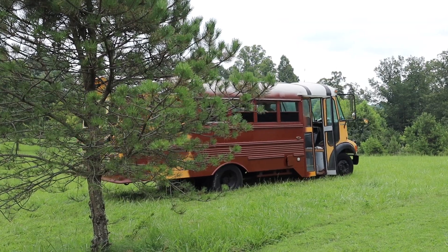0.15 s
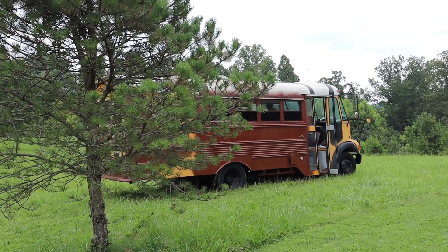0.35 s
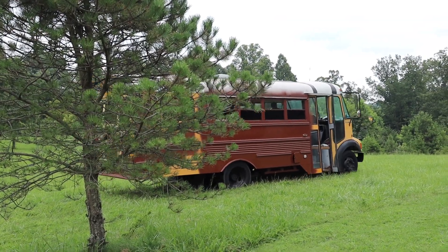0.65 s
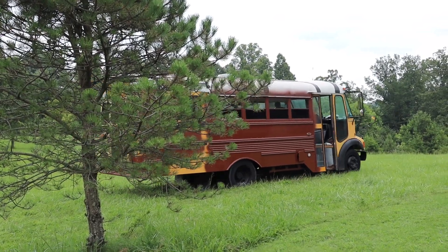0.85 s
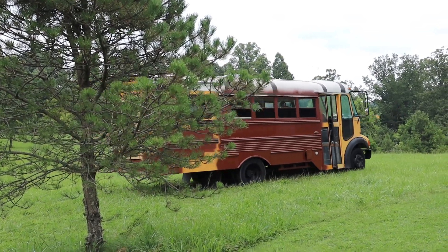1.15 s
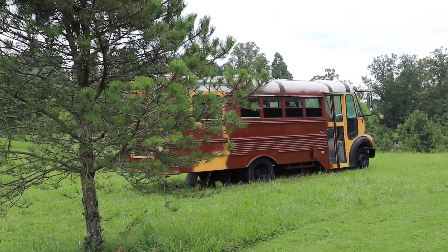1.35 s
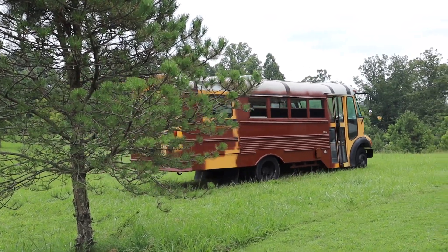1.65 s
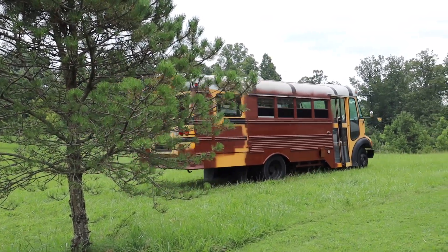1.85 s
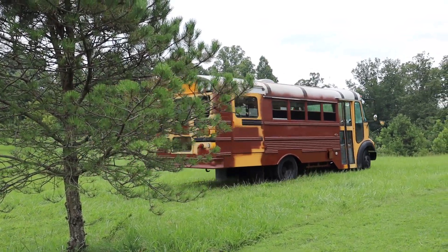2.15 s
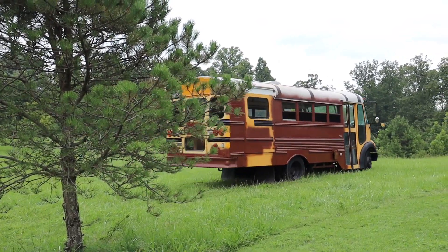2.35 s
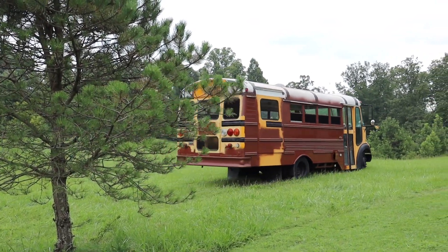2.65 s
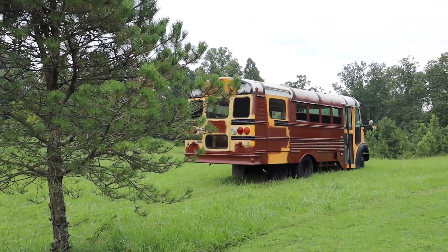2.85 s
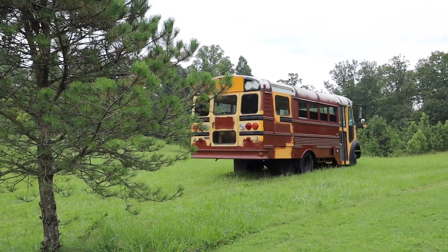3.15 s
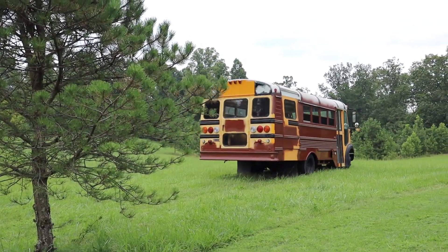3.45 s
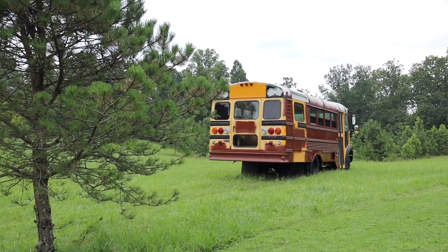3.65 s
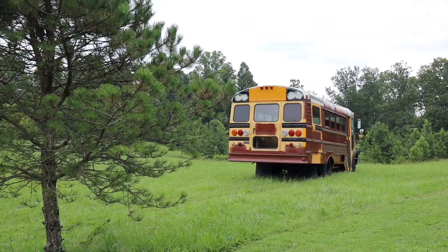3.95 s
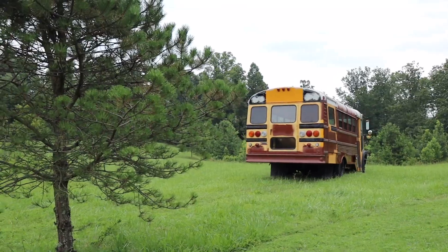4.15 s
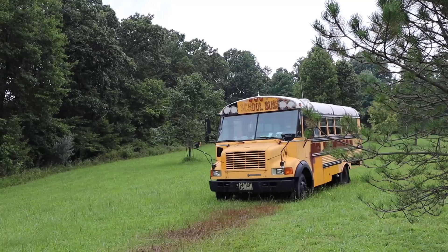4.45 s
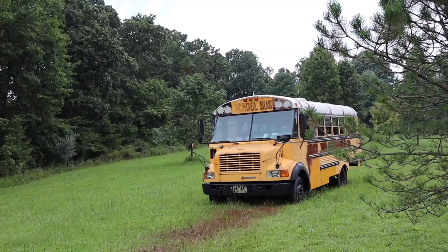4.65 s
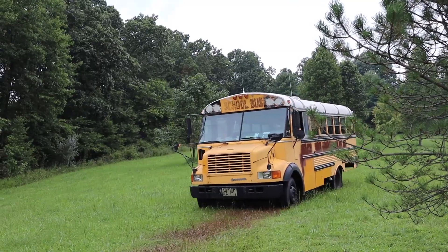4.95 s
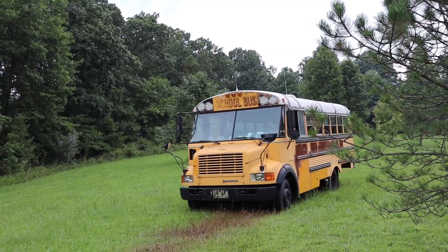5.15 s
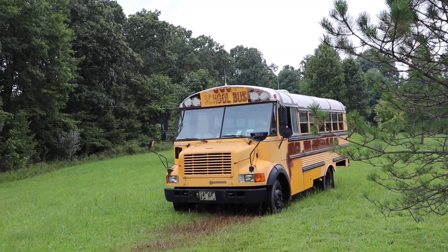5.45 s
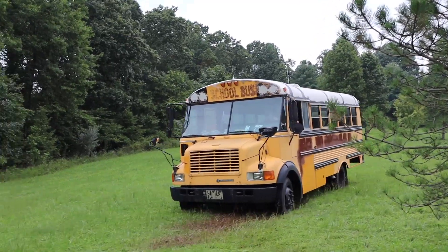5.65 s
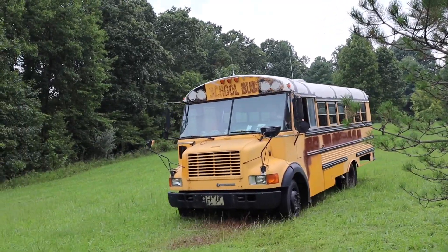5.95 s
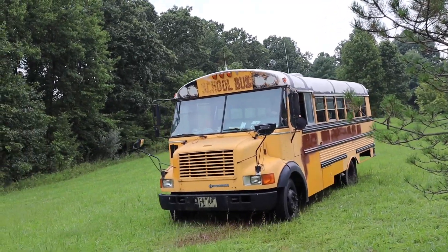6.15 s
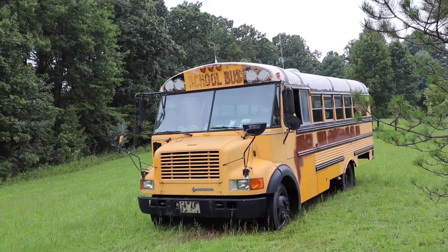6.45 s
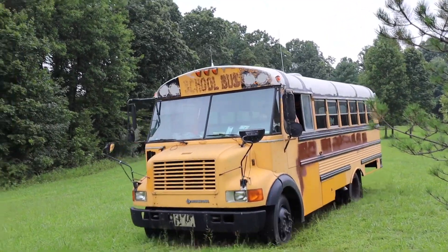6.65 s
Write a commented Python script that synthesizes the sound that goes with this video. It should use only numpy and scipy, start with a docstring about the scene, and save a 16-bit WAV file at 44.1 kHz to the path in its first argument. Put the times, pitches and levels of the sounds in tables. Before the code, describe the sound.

An old diesel bus pulls away with a clattering drone, drops to a lumpy idle, then abruptly comes closer from the front, revving up over crackling grass.

```python
"""An old V8 diesel bus crawls over a grass field: from behind it pulls away, drops to idle and picks up;
then the view jumps to its front as it comes closer and gathers speed. One crank phase drives the exhaust
(summed sines), body rumble and clatter (noise rings struck at each firing); a pulley hums out of step with it.
The body clunks in clusters of modes, grass crackles and snaps under the tyres (noise bursts),
and insects and a soft low noise (both filtered noise) lie around it."""
import sys
import numpy as np
from scipy import signal
from scipy.fft import rfft, irfft
from scipy.io import wavfile
from scipy.ndimage import uniform_filter1d

SR = 44100
rng = np.random.default_rng(int(sys.argv[2]) if len(sys.argv) > 2 else 0)


def persist_wave(psi):
    """Save psi, clipped to +-1, as 16-bit WAV."""
    counts = np.round(np.clip(psi, -1, 1) * 32767).astype(np.int16)
    wavfile.write(sys.argv[1], SR, np.atleast_2d(counts).T)


N = 299880
TIME, HZ = np.arange(N) / SR, np.fft.rfftfreq(N, 1 / SR)

CUT_S = 4.442  # the view jumps from behind the bus to its front
CYLINDERS = 8
CRAWL_HZ = 85  # firings per second at crawling speed, the reference for all levels that follow speed
PULL_CLATTER_DB, PULL_SHAKE_DB = 1.5, 18  # lift per octave a second of rising speed
BURST_BUZZ = 0.45  # the clatter swells by 1 minus this share of each idling burst's dB, the cover buzz by twice it

# engine speed from behind: pulls away, drops to idle, picks up: t/s, firing rate/Hz
SPEED_BEHIND = [(0, 82.2), (.5, 84.4), (1.1, 85.5), (2, 87.5), (2.2, 87.3), (2.31, 81), (2.42, 58.5),
                (2.6, 54.6), (2.87, 49.6), (3.09, 51.3), (3.3, 50.4), (3.63, 50.3), (3.98, 54),
                (4.44, 57.3)]
# engine speed from the front, gathering: t/s, firing rate/Hz
SPEED_FRONT = [(4.44, 84.2), (4.95, 84.5), (5.3, 87.6), (5.5, 90.4), (5.9, 93.4), (6.3, 95.3), (6.53, 95.8),
               (6.8, 98)]
# likeness of left and right from behind: f/Hz, correlation (-1..1)
SAME_BEHIND = [(130, 0.95), (700, 0.95), (1250, 0.85), (2000, 0.8), (3000, 0.55), (4200, 0.75),
               (6000, -0.25), (8000, 0), (14000, 0.6)]
# stereo balance from the front: f/Hz, left minus right/dB
PAN_FRONT = [(680, 4), (1250, -1), (2300, -3.5), (4200, -4), (7700, 5), (14000, -1.5)]


def amp(db):
    """Decibels to gain."""
    return 10 ** (np.asarray(db) / 20)


def unit(x):
    """Scales to rms 1."""
    return x / np.sqrt(np.mean(x ** 2) + 1e-20)


def curve(rows):
    """Each column of a table of (t/s, ..) rows at every sample."""
    s, *columns = np.transpose(rows)
    return [np.interp(TIME, s, c) for c in columns]


def read(points):
    """A table of (f/Hz, value) rows at every frequency, interpolated along log frequency."""
    f, value = np.transpose(points)
    return np.interp(np.log(HZ + 1), np.log(f + 1), value)


def colour(x, db):
    """Filters by a gain in dB at every frequency."""
    return irfft(rfft(x) * amp(db), N)


def band_rms(x, lo, hi):
    """Rms of the part of x between two frequencies."""
    return np.sqrt(2 * np.sum(abs(rfft(x)[(HZ > lo) & (HZ < hi)]) ** 2)) / N


def drift(hz):
    """Slow random wander of rms 1, up to about hz."""
    knots = rng.standard_normal(1000)
    return unit(np.interp(TIME * 2 * hz, np.arange(1000), knots))


def add(mix, s, sound):
    """Mixes a sound in at time s."""
    part = mix[..., round(s * SR):][..., :sound.shape[-1]]
    part += sound[..., :part.shape[-1]]


def bell(hz, centre, width):
    """Shape of a resonance: 1 at its centre, a half at its edges."""
    return 1 / (1 + (2 * (hz - centre) / width) ** 2)


def swell(s, half_s):
    """A smooth rise and fall, 1 at time s and 1/e at half_s to either side."""
    return np.exp(-np.minimum(((TIME - s) / half_s) ** 2, 20))


def by_view(front, behind_value, front_value):
    """One value while the bus is heard from behind, another from the front."""
    return (1 - front) * behind_value + front * front_value


def stereo(pair, same, pan):
    """Turns two unrelated sounds into a left and right that are partly alike."""
    a, b = rfft(pair)
    likeness = np.clip(read(same), -.95, 1)
    mid, side = a * np.sqrt((1 + likeness) / 2), b * np.sqrt((1 - likeness) / 2)
    left = (mid + side) * amp(read(pan) / 2)
    right = (mid - side) * amp(-read(pan) / 2)
    # keeps the shared middle steady whatever the likeness
    return irfft(np.array([left, right]) / np.sqrt((1 + likeness) / 2), N)


def idling(revs):
    """0 at crawling speed and above, 1 at idle, 0.7 octaves lower."""
    return np.clip(-revs / 0.7, 0, 1)


def speeding_up(smooth_s=0.3):
    """How fast the approaching engine gathers speed, in octaves a second."""
    rise = np.gradient(np.log2(curve(SPEED_FRONT)[0])) * SR
    return uniform_filter1d(rise, round(smooth_s * SR))


def running_down(smooth_s=0.054):
    """How fast the engine heard from behind loses speed, in octaves a second."""
    fall = -np.gradient(np.log2(curve(SPEED_BEHIND)[0])) * SR
    return uniform_filter1d(np.maximum(fall, 0), round(smooth_s * SR))


def note_db(firing_hz, revs, front, pipe_hz=84.7, width_hz=9.1, db_per_octave=9.5):
    """The firing note grows with speed, booms in the exhaust pipe, and fades or nears with the bus."""
    # each view: level/dB as it opens, change/dB per s, lift/dB at the pipe resonance
    note_behind = (-22.5, -3.5, 11.7)
    note_front = (-30.5, 2.8, 13)
    start_db, db_per_s, lift_db = (by_view(front, *pair) for pair in zip(note_behind, note_front))
    moving_db = db_per_s * (TIME - front * CUT_S)
    return start_db + moving_db + lift_db * bell(firing_hz, pipe_hz, width_hz) + db_per_octave * revs


def exhaust(cycles, cycle_hz, revs, front, waver_db=1.16, flutter_db=0.35, stumble=0.0005):
    """The firing note, its overtones and tones of the unequal cylinders, swelling across resonances."""
    # tones before speed and boom lifts: multiple of the engine cycle, level/dB pulling away,
    # level/dB at idle, level/dB crawling in from the front, level/dB once up to speed
    tone_levels = [(4, -57, -60, -54, -49), (6, -49, -38, -42, -37), (7, -30, -43, -41, -28.5),
                   (10, -37, -37, -37.5, -36.5), (11, -38, -58, -37, -42), (12, -31, -38, -40, -43),
                   (13, -44, -48, -34, -32), (14, -32.5, -41, -45, -30.5), (15, -43, -48, -44, -37),
                   (16, -30.5, -35.5, -32, -35.5), (17, -45, -47, -41, -37), (18, -49, -42, -46, -37.5),
                   (19, -47, -61, -32.5, -29.5), (20, -50, -47, -44, -43), (21, -42, -53, -28.5, -34),
                   (22, -53, -48, -29, -46), (24, -41.5, -38.5, -35.5, -44), (26, -42, -59, -43, -61),
                   (27, -47, -63, -41, -45), (28, -42.5, -49, -48, -49), (29, -50, -56, -42.5, -51),
                   (30, -56, -44, -51, -44), (32, -52.5, -52, -43.5, -42.5), (34, -46.5, -53, -42, -61),
                   (38, -49.5, -43.5, -44.5, -54), (48, -55, -56, -50, -48), (53, -68.5, -53, -67, -60),
                   (56, -59.5, -63, -46, -50)]
    # resonances crossed by the tones: f/Hz, width/Hz, lift/dB at idle from behind, lift/dB from the front
    boom_modes = [(102, 13, 7, 5.5), (166.2, 14.7, 13, 1.5), (559, 17, 15, 17.5)]
    driving_hz, db_per_octave = 93, 4  # firing rate once up to speed; growth of the tones

    cycles = cycles + stumble * drift(20)  # no two firings are evenly spaced
    level_db = note_db(cycle_hz * CYLINDERS, revs, front) + flutter_db * drift(11)
    out = amp(level_db) * np.cos(2 * np.pi * cycles * CYLINDERS)
    idle = idling(revs)
    driving = np.clip(revs / np.log2(driving_hz / CRAWL_HZ), 0, 1)
    booms = [(hz, width, by_view(front, idle * idle_lift, front_lift))
             for hz, width, idle_lift, front_lift in boom_modes]
    for order, pulling_db, idle_db, crawling_db, driving_db in tone_levels:
        behind_db = pulling_db + idle * (idle_db - pulling_db)
        ahead_db = crawling_db + driving * (driving_db - crawling_db)
        boom_db = sum(db * bell(order * cycle_hz, hz, width) for hz, width, db in booms)
        level_db = by_view(front, behind_db, ahead_db) + db_per_octave * revs + boom_db
        tone = np.cos(2 * np.pi * (order * cycles + rng.random()))
        out += amp(level_db + waver_db * drift(5)) * tone
    return np.sqrt(2) * out  # levels are rms


def knocks(cycles, ring_s, uneven, fresh, jitter_s=.00005, chance_db=1.5, rise_s=0.0019, delay_s=0.001001):
    """Each cylinder strikes the block with its own ring once a cycle; a share of every blow is new noise."""
    # strength of each cylinder's knock in firing order, scaled by uneven: level/dB
    cylinder_db = [0.15, 0.63, 1.3, 0.54, 0.87, -2.1, 0.68, -0.81]
    at = np.flatnonzero(np.diff(np.floor(cycles * CYLINDERS)))
    cylinder = np.arange(1, len(at) + 1) % CYLINDERS
    late, force = rng.standard_normal((2, len(at)))
    at = np.clip(at + np.round((delay_s + late * jitter_s) * SR).astype(int), 0, N - 1)
    size = amp(uneven * np.array(cylinder_db)[cylinder] + chance_db * force)
    t = np.arange(4096) / SR
    decay = np.exp(-t / ring_s) * (1 - np.exp(-t / rise_s))
    rings, power = np.zeros((2, N)), np.zeros(N)
    for k in range(CYLINDERS):
        blows = np.bincount(at[cylinder == k], size[cylinder == k], N)
        ring = decay * rng.standard_normal((2, len(t)))
        rings += signal.oaconvolve(blows[None], ring, axes=1)[:, :N]
        power += blows ** 2
    envelope = np.sqrt(abs(signal.oaconvolve(power, decay ** 2)[:N]))
    hiss = envelope * rng.standard_normal((2, N))
    return np.sqrt(1 - fresh) * unit(rings) + np.sqrt(fresh) * unit(hiss)


def rumble(cycles, revs, front, behind_db=-31.5, front_db=-32.5, db_per_octave=6):
    """Puffs of gas shake the pipe and the body panels, harder while the bus gathers speed."""
    # relative colour of the shaking: f/Hz, gain/dB
    rumble_colour = [(20, -30), (40, -15), (70, -3), (130, -4.5), (210, -.5), (290, -2), (400, -9.5),
                     (480, -13), (600, -34), (1000, -82)]
    blows = knocks(cycles, ring_s=0.024, uneven=0.74, fresh=0.66, chance_db=1.2)[0]
    out = colour(blows, read(rumble_colour))
    level_db = by_view(front, behind_db, front_db) + db_per_octave * revs + PULL_SHAKE_DB * speeding_up()
    return amp(level_db) * out / band_rms(out, 190, 480)


def pulley(cycles, cycle_hz, revs, front, waver_db=2, db_per_octave=14, turns_per_cycle=6.43):
    """A belt-driven pulley hums out of step with the firings and sinks away at idle."""
    # hum at crawling speed: harmonic, level/dB from behind, level/dB from the front
    hum_levels = [(2, -37, -36), (3, -44, -49.5), (4, -39, -39), (5, -56, -43.5), (6, -48.5, -47.5),
                  (7, -58, -52.5), (10, -60, -45)]
    # panel that sings when the hum crosses it, from behind: f/Hz, width/Hz, lift/dB
    panel_hz, width_hz, lift_db = (484, 9.7, 18.4)
    hum = np.zeros(N)
    for k, behind_db, front_db in hum_levels:
        order = k * turns_per_cycle
        sing_db = (1 - front) * lift_db * bell(order * cycle_hz, panel_hz, width_hz)
        level_db = by_view(front, behind_db, front_db) + sing_db + waver_db * drift(5.4)
        hum += amp(level_db) * np.cos(2 * np.pi * (order * cycles + rng.random()))
    return np.sqrt(2) * amp(db_per_octave * revs) * hum


def with_fan(blows):
    """The even rush of the cooling fan fills the gaps between knocks, mostly in the treble."""
    # smooth rush in the engine noise: f/Hz, share of power (0-1)
    fan_share = [(500, 0.13), (2500, 0.24), (4500, 0.16), (7000, 0.4), (12000, 0.9)]
    share = read(fan_share)
    rush = rfft(rng.standard_normal((2, N)))
    return irfft(rfft(blows) * np.sqrt(1 - share) + rush * np.sqrt(share), N)


def clatter(blows, shape, from_front):
    """Combustion knock coloured by the resonances of the block, at rms 1 in its middle band."""
    # ringing of block and covers: f/Hz, width/Hz, lift/dB from behind, lift/dB from the front
    block_modes = [(563, 9.1, 10, -2.5), (811, 89, 3, 9), (1275, 113, 8, 7.5), (1722, 18, 0, 3),
                   (1860, 49, 8, 8.5), (1954, 61, 9, 4.5), (2200, 53, 3, -3.5), (2393, 28, 5, 4.5),
                   (2515, 47, 7, -1.5), (2833, 37, 6, 7.5), (3060, 39, 6.5, 3), (3860, 420, 3, 2)]
    peaks = sum((front_lift if from_front else behind_lift) * bell(HZ, hz, width)
                for hz, width, behind_lift, front_lift in block_modes)
    out = colour(blows, read(shape) + peaks)
    return out / band_rms(out.mean(0), 1100, 4000)


def clatter_behind(cycles):
    """The throttle blends two colours of the same knocks, one under load and one at idle."""
    # throttle opening, the share of the loaded colour: t/s, share (0-1)
    throttle = [(0, 0.65), (2.22, 0.56), (2.42, 0.43), (4.4, 0.19)]
    # relative colour under load: f/Hz, gain/dB
    load_colour = [(200, -11), (600, -13.5), (900, -7), (1500, -4), (2000, -0.5), (2500, -3.5), (3100, -5),
                   (3400, -7), (3900, -8.5), (5500, -15), (7500, -31), (10500, -19), (12200, -39),
                   (14500, -72)]
    # relative colour at idle: f/Hz, gain/dB
    idle_colour = [(200, -21), (600, -19.5), (900, -14.5), (1300, -10.5), (1500, -9.5), (1700, 5.5),
                   (2200, -1.5), (3000, -12), (3300, -22.5), (4000, -19.5), (5000, -31.5), (7000, -24),
                   (10500, -41.5), (12200, -44), (14500, -64)]
    # stereo balance from behind: f/Hz, left minus right/dB
    pan_behind = [(200, -10.5), (680, 1.5), (1250, -5.5), (2300, -5), (3000, -10), (4200, -5), (7700, 0)]
    blows = knocks(cycles, ring_s=0.02, uneven=0.76, fresh=0.064, jitter_s=.00003, chance_db=1.44)
    blows = stereo(with_fan(blows), SAME_BEHIND, pan_behind)
    load = curve(throttle)[0]
    return load * clatter(blows, load_colour, False) + (1 - load) * clatter(blows, idle_colour, False)


def bursts_db():
    """Short swells of the idling clatter as the engine rocks on its mounts, in dB."""
    # bursts, shared by clatter and cover: t/s, swell/dB
    burst_swells = [(2.43, 2), (2.49, 0.5), (2.555, 2.5), (2.64, 2.5), (2.705, 2.5), (2.8, 3.5),
                    (2.857, 3.5), (2.912, 2.5), (2.96, 1.5), (3.03, 1), (3.13, 0), (3.165, 3), (3.24, 1),
                    (3.33, 0.5), (3.462, 4.5), (3.61, 2), (3.655, 3), (3.75, 1.5), (3.805, 0.5), (3.84, 2),
                    (3.93, 0.5), (3.995, 0.5), (4.13, 1.5), (4.29, 1)]
    return sum(db * swell(at, 0.019) for at, db in burst_swells)


def surges_db(revs, idle_db=-1):
    """The clatter dips as the throttle shuts, then comes in bursts at idle, in dB."""
    # dip as the throttle shuts: t/s, change/dB, half length/s
    s, dip_db, half_s = (2.327, -2.5, 0.074)
    return dip_db * swell(s, half_s) + idle_db * idling(revs) + (1 - BURST_BUZZ) * bursts_db()


def insects(level_db=-55, swell_db=1):
    """A far, even chorus of band-shaped noise off to one side of the field."""
    # relative colour of the chorus: f/Hz, gain/dB
    chorus_colour = [(3000, -40), (6000, -9), (6900, 10), (7900, 10.5), (8700, -26), (10000, -17),
                     (11000, -20), (12600, -40), (14500, -55)]
    chorus = stereo(rng.standard_normal((2, N)), SAME_BEHIND, PAN_FRONT)
    chorus = colour(chorus, read(chorus_colour))
    return amp(level_db + swell_db * drift(8.4)) * chorus / np.std(chorus.mean(0))


def low_noise(level_db=-51, sway_db=3):
    """Soft low noise around the scene, partly alike on both sides."""
    # relative colour of the low noise: f/Hz, gain/dB
    low_colour = [(10, -5), (25, -1), (45, -15), (100, -42), (250, -1), (600, -9.5), (2000, -64)]
    noise = rng.standard_normal(N) + rng.standard_normal((2, N))
    return amp(level_db + sway_db * drift(1.1)) * unit(colour(noise, read(low_colour)))


def clunks(count=7, rise_s=0.004):
    """On bumps, a loose panel rings briefly with a cluster of close modes."""
    # bumps: t/s, peak level/dB, f/Hz, t60/s, spread of the modes as a share of the pitch
    bump_hits = [(1.365, -16.5, 823, 0.033, 0.157), (2.174, -19.5, 915, 0.03, .07),
                 (3.917, -34, 855, 0.044, .08), (3.917, -20.5, 353, 0.092, 0.077),
                 (3.953, -27, 308, 0.35, 0.11)]
    out, t = np.zeros(N), np.arange(SR // 3) / SR
    for s, db, hz, t60, spread in bump_hits:
        modes = sum(np.sin(2 * np.pi * hz * (1 + spread * k) * t) * np.exp(-k ** 2 / 2)
                    for k in np.linspace(-2, 2, count))
        ring = modes * amp(-60 * t / t60) * (1 - np.exp(-t / rise_s))
        add(out, s, amp(db) * ring / abs(ring).max())
    return out


def cover_buzz(rattle, hz=1885, width_hz=230, strain_db=-4.5):
    """Under strain, and with each burst at idle, one engine cover rings out of the clatter."""
    strain = amp(strain_db) * swell(1.81, 0.16)
    drive = strain + amp(2 * BURST_BUZZ * bursts_db()) - 1
    return drive * irfft(rfft(rattle) * bell(HZ, hz, width_hz), N)


def grass(snap_db=-7.5, snap_s=0.0056, stalks_per_s=450, spread_db=6.0):
    """Tyres crush many small stalks and snap a few thick ones."""
    # crackle of crushed grass: t/s, level/dB
    crush_levels = [(4.4, -47), (5.2, -38.5), (5.7, -33), (6.2, -31.5), (6.8, -34)]
    # thick stalks: t/s, level/dB before the snap_db trim
    stalk_hits = [(5.495, -26), (5.649, -14), (5.667, -21), (5.731, -22), (5.78, -22), (5.851, -12),
                  (5.899, -15), (6.034, -20), (6.106, -14.5), (6.165, -18), (6.201, -20), (6.28, -22),
                  (6.436, -15.5), (6.7, -18), (6.739, -8)]
    # relative colour of breaking stalks: f/Hz, gain/dB
    snap_colour = [(1500, -29), (3500, -2.5), (5400, 5), (7000, -4.5), (10500, -13.5), (14500, -40)]
    t = np.arange(2048) / SR
    size = amp(spread_db * np.minimum(rng.exponential(1, N), 3)) * (rng.random(N) < stalks_per_s / SR)
    crackle = np.sqrt(abs(signal.oaconvolve(size ** 2, np.exp(-t / 0.008))[:N]))
    level = unit(crackle) * amp(curve(crush_levels)[0])
    for s, db in stalk_hits:
        add(level, s, amp(db + snap_db) * np.exp(-t / snap_s))
    shape = read(snap_colour)
    noise = rng.standard_normal((2, N)) + rng.standard_normal(N)  # partly alike left and right
    return colour(level * unit(noise), shape) / np.sqrt(np.mean(amp(shape) ** 2))


def clatter_front(cycles):
    """The engine's knocks and fan as heard from the front."""
    # relative colour from the front: f/Hz, gain/dB
    front_colour = [(150, -37), (450, -8.5), (620, -1.5), (980, -6), (1400, -0.5), (2200, 2.5), (2900, -7),
                    (3400, -11.5), (5400, -19.5), (7000, -26.5), (10500, -28), (12000, -35), (14500, -52)]
    # likeness of left and right: f/Hz, correlation (-1..1)
    same_front = [(130, 0.97), (700, 0.99), (1250, 0.98), (2000, 0.94), (3000, 0.8), (4200, 0.7),
                  (6000, 0.63), (8000, 0.13), (14000, .1)]
    blows = with_fan(knocks(cycles, ring_s=0.02, uneven=1.0, fresh=0.09))
    return clatter(stereo(blows, same_front, PAN_FRONT), front_colour, True)


def scene():
    """One crankshaft drives exhaust, rumble and clatter, heard from behind and then from the front."""
    behind_db, front_db, db_per_octave = -25, -20.5, 6  # clatter at crawling speed, growth with speed
    coast_db = -0.5  # quieter with the fuel cut, per octave a second of falling speed
    front = np.clip((TIME - CUT_S) / 0.0015, 0, 1)
    firing_hz = by_view(front, curve(SPEED_BEHIND)[0], curve(SPEED_FRONT)[0])
    revs = np.log2(firing_hz / CRAWL_HZ)  # octaves above crawling speed
    cycle_hz = firing_hz * (1 + .002 * drift(10)) / CYLINDERS
    cycles = np.cumsum(cycle_hz) / SR
    coasting_db = coast_db * running_down()

    low = amp(coasting_db) * exhaust(cycles, cycle_hz, revs, front)
    low += rumble(cycles, revs, front) + pulley(cycles, cycle_hz, revs, front) + clunks()
    effort_db = db_per_octave * revs + coasting_db + PULL_CLATTER_DB * speeding_up() + surges_db(revs)

    hidden_db = -2 * np.maximum(TIME - 3.4, 0)  # the bus turns and its body hides the engine
    rattle = clatter_behind(cycles)
    leaving = amp(behind_db + effort_db + hidden_db) * (rattle + cover_buzz(rattle)) + low
    # the bus is off to the right, so the left ear hears it two samples late
    leaving = np.array([np.roll(leaving[0], 2), leaving[1]])

    nearing_db = 0.5 * (TIME - CUT_S)  # the clatter grows as the bus comes closer
    coming = amp(front_db + nearing_db + effort_db) * clatter_front(cycles) + low + grass()
    return by_view(front, leaving, coming) + insects() + low_noise()


def record(dry):
    """A steep linear-phase low-pass closes the band at 14.75 kHz."""
    edge = signal.firwin(511, 14750, window=("kaiser", 9), fs=SR)
    return signal.oaconvolve(dry, edge[None], "same")


dry = scene()
out = record(dry)
persist_wave(out)
```